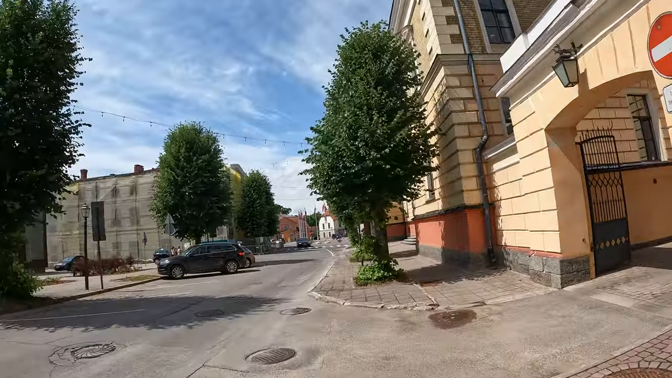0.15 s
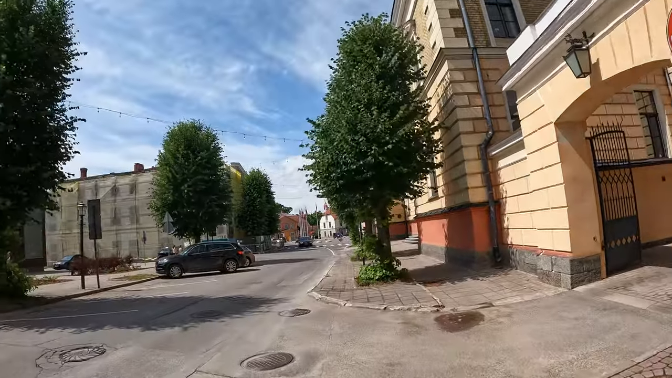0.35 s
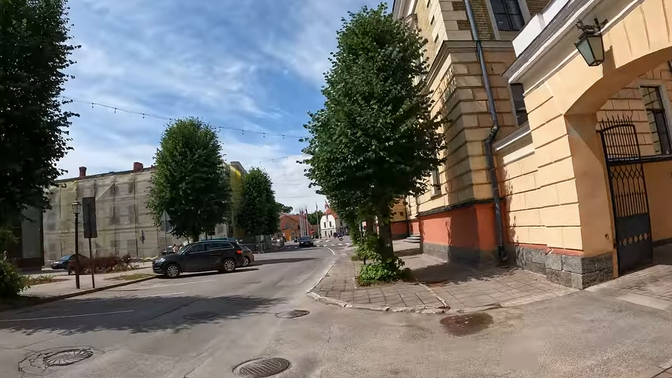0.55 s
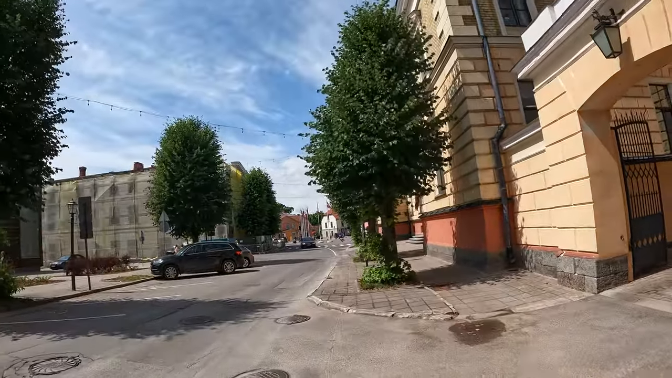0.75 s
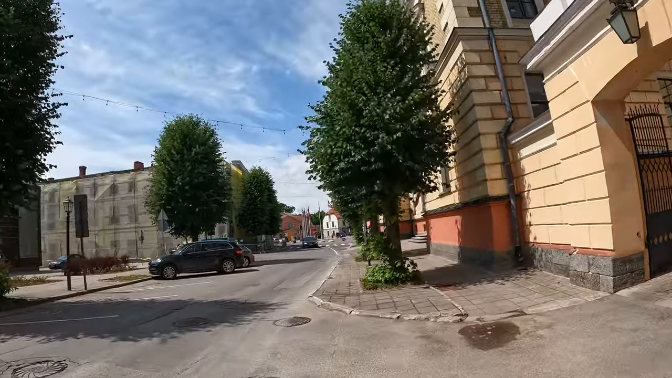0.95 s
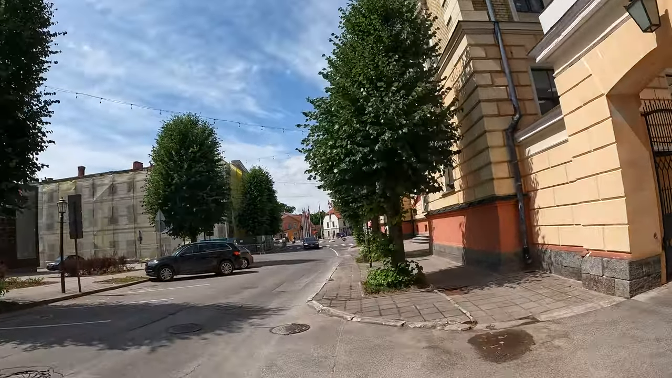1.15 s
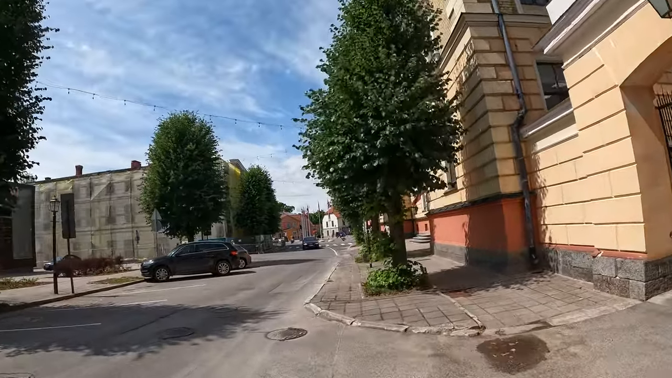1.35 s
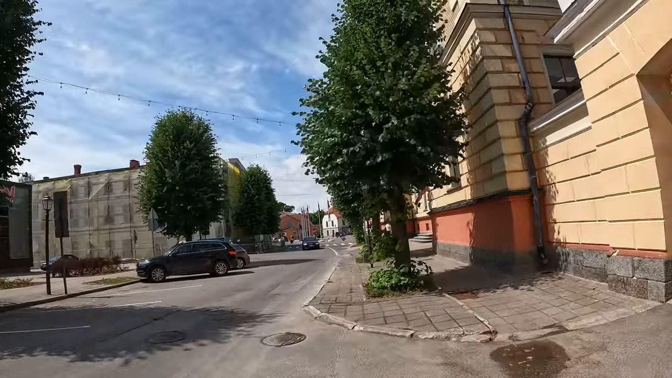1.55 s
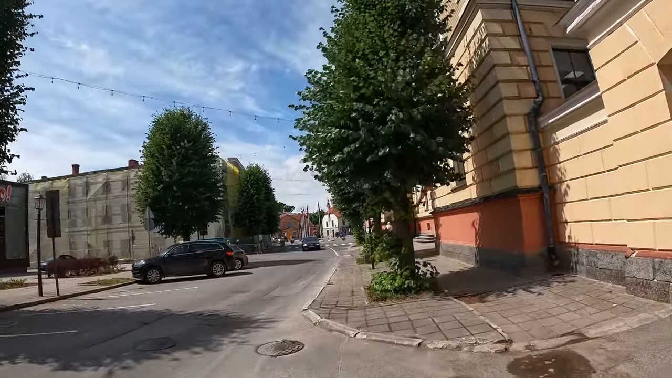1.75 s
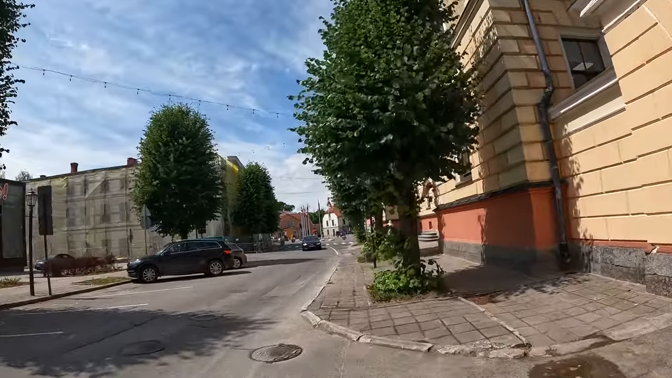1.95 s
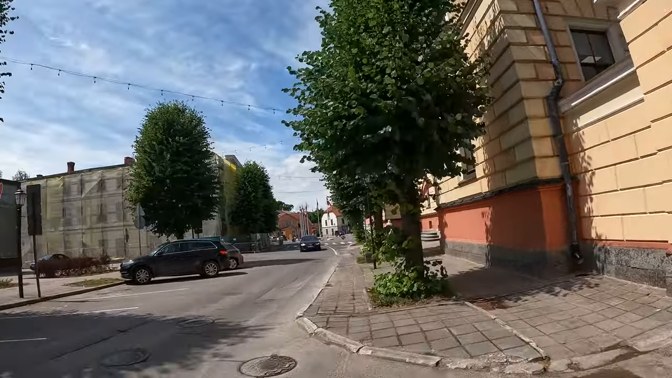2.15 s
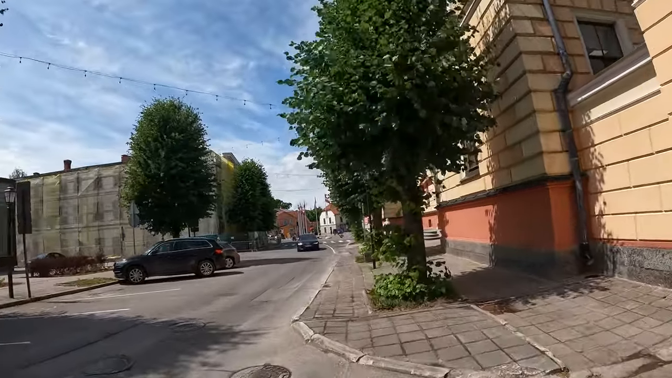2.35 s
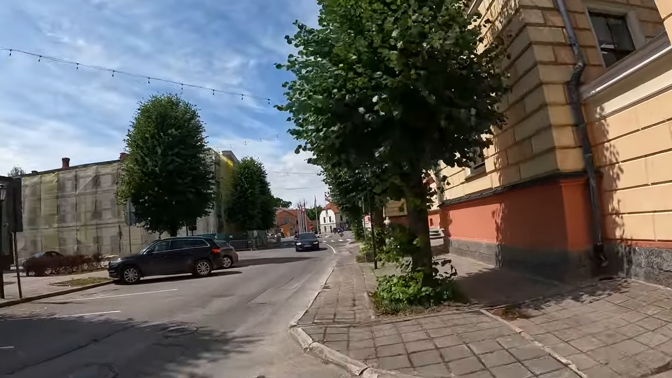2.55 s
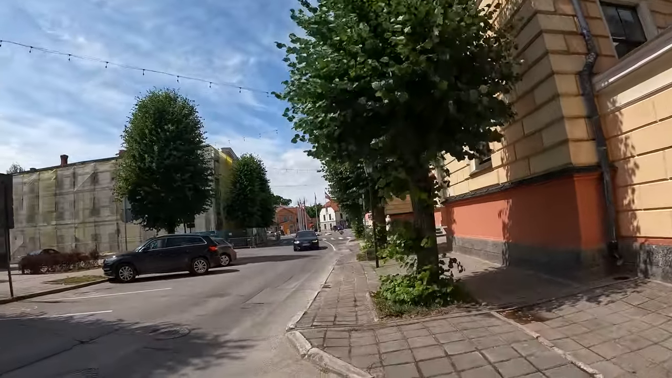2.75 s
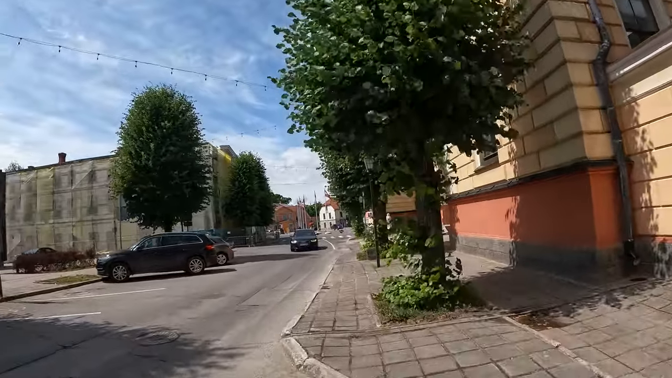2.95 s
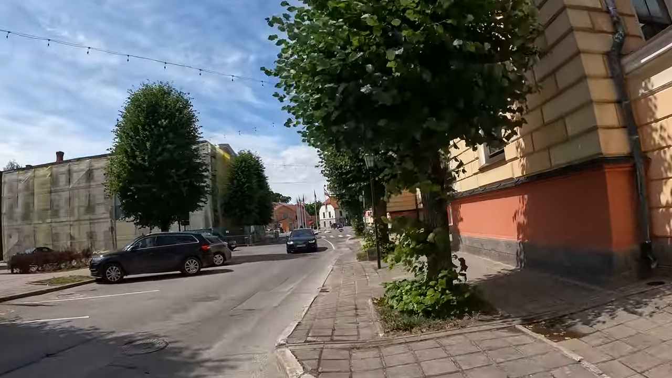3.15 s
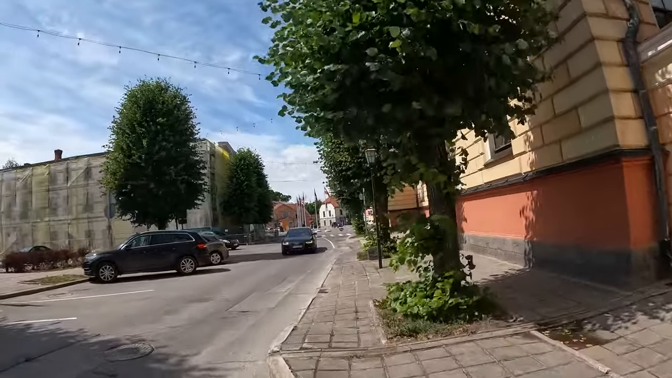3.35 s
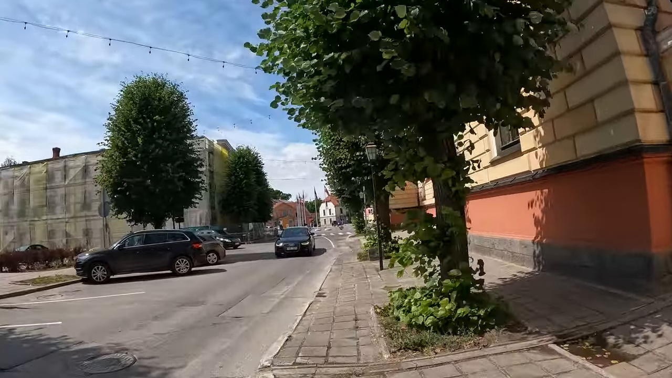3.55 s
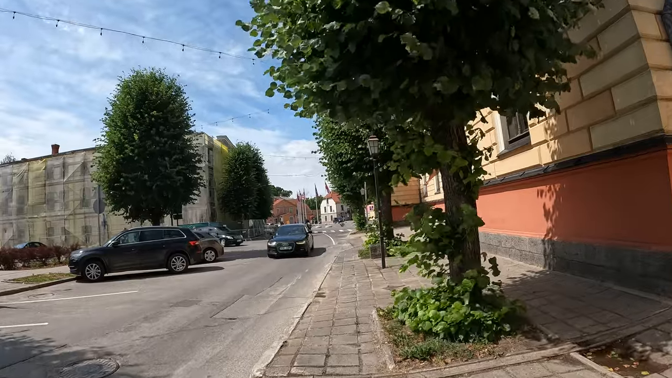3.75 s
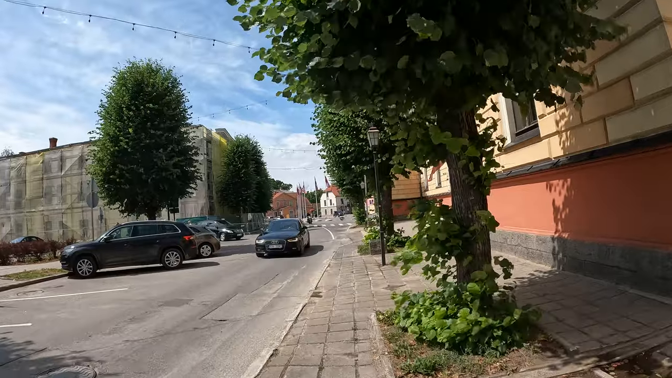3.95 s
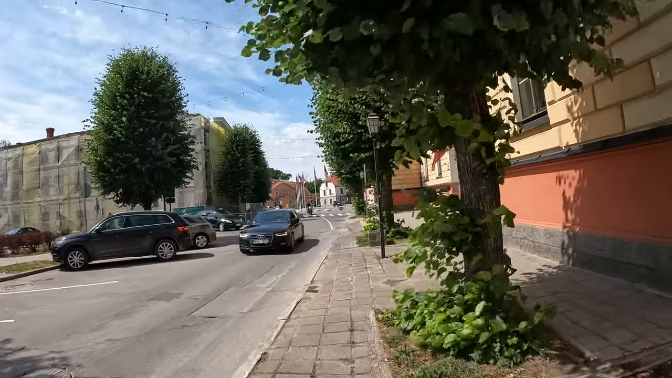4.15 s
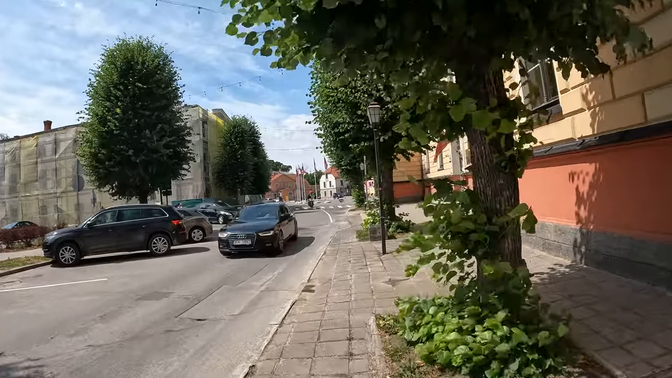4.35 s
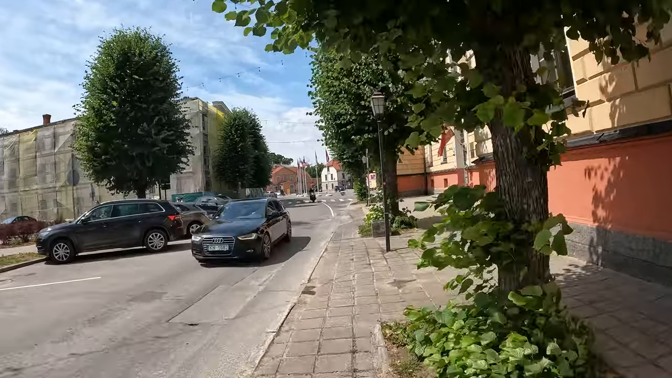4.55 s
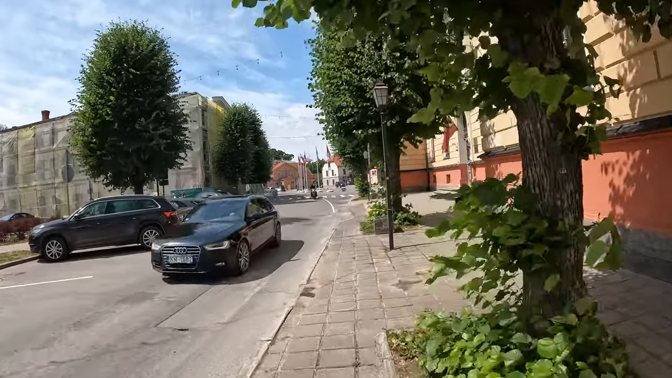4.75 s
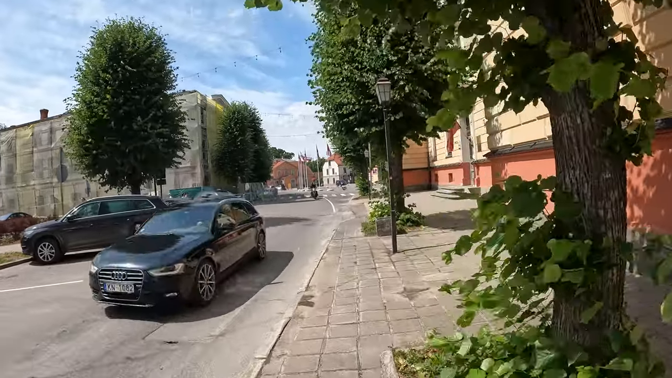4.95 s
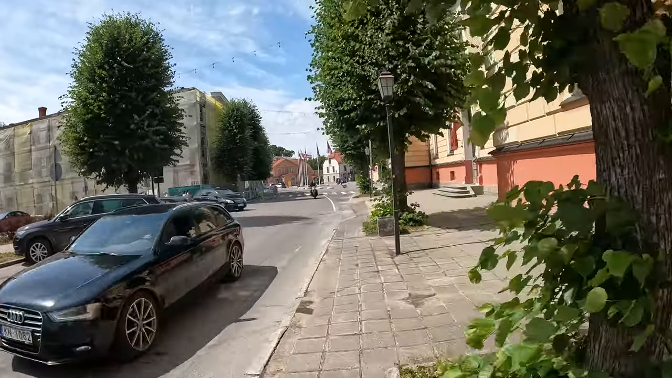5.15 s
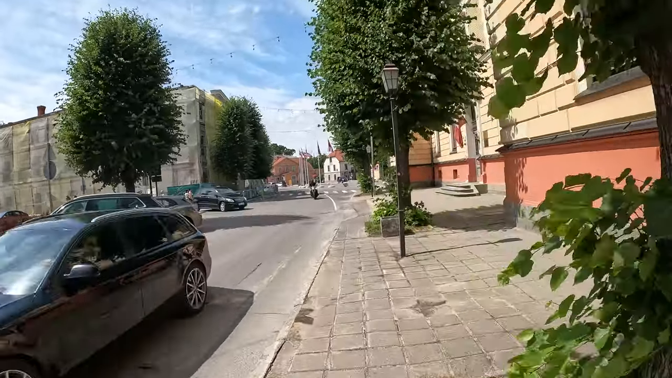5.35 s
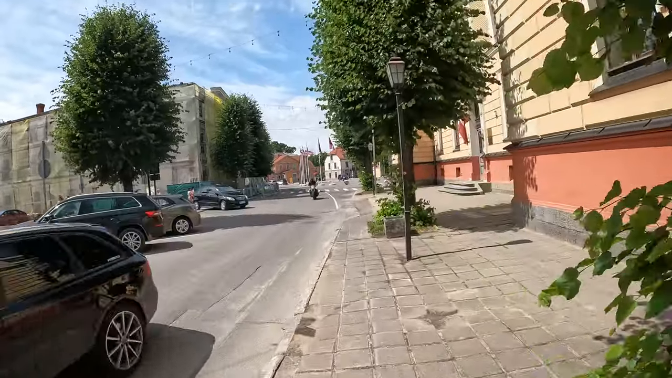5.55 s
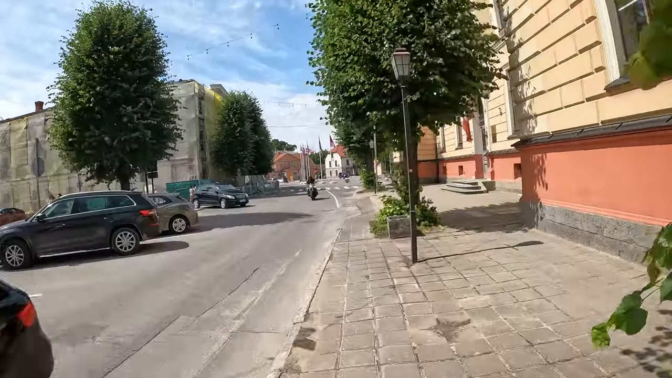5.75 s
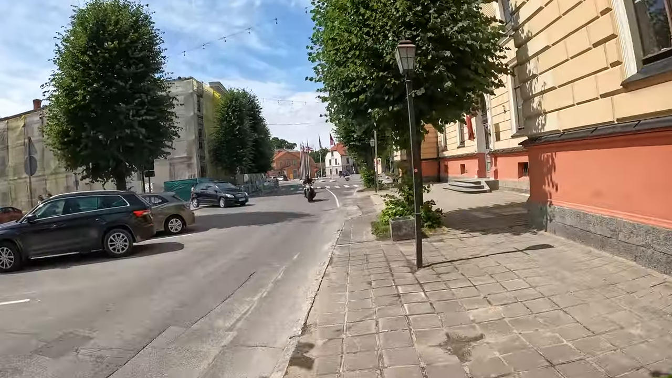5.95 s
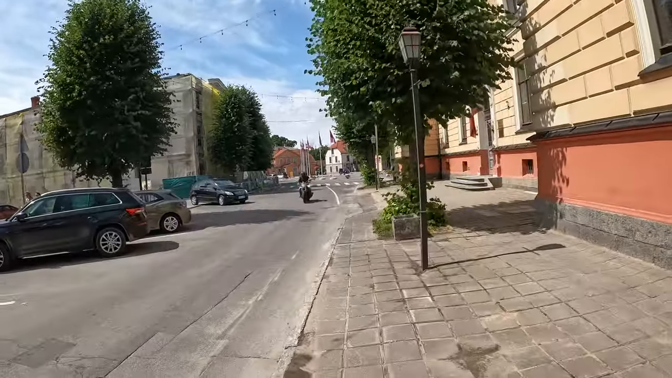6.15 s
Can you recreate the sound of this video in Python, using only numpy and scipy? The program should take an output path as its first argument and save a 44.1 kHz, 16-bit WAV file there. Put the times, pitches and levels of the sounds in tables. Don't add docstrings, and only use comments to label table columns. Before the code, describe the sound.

Tyre noise on asphalt starts faint and grows into a full, hissing rush as a car passes close beside the pavement. Beneath it a motorcycle hums in clear, wavering low tones, climbs in revs, dips at a gear change and continues with a thin whine. Wind lumps buffet the covered single microphone, over low street rumble, with sparse shoe scuffs, gritty ticks and heel knocks.

```python
import sys
import numpy as np
from scipy import signal
from scipy.fft import rfft, irfft, next_fast_len
from scipy.io import wavfile

SR = 44100
rng = np.random.default_rng(int(sys.argv[2]) if len(sys.argv) > 2 else 0)


def rack_gain(trim_db):
    fader = np.asarray(trim_db, float)
    return 10 ** (fader / 20)


def wrap_up_sound(samples):
    columns = np.atleast_2d(samples).T
    tamed = np.clip(columns, -1, 1)
    steps = np.round(tamed * 32767).astype(np.int16)
    wavfile.write(sys.argv[1], SR, steps)


N = 273856

# time in seconds, roar in dB, brightness in dB (open sight line or leaves and cars).
CAR_PASS = [(0, -47.5, 3.2), (.5, -45, -4.5), (1, -45.5, -1.5), (1.5, -37, -2.5), (2.1, -36, -1),
            (2.5, -37.5, -4), (3.2, -37.5, -3), (3.7, -35, 1), (4.1, -32.5, -1), (4.5, -30.5, -2),
            (4.9, -28.5, -0.5), (5.18, -27, 0), (5.28, -24.5, -1.5), (5.4, -30, -1.5), (5.84, -33.5, 0.2),
            (6.21, -39.5, 2)]
# frequency in Hz, level in dB.
ROAR_COLOUR = [(150, 15), (250, 2), (400, -4.5), (600, 0), (800, -3), (1000, 1), (1200, -6.5), (1700, -3.5),
               (2500, -43.5)]
# frequency in Hz, level in dB per Hz.
HISS_COLOUR = [(1000, 5), (1700, -3), (2500, 2), (3600, -5), (4500, -8), (6000, -15), (7500, -21),
               (10000, -25)]
# frequency in Hz, level in dB per Hz.
FIZZ_COLOUR = [(6000, -16), (8000, -2), (11000, -8.5), (16000, -3.5)]
# time in seconds, centre in Hz.
TREAD_NOTE = [(0, 726.4), (2, 829), (4.1, 854), (4.75, 661), (5.28, 538.4), (5.6, 620), (6.21, 531)]
# start in seconds, end in seconds, level in dB.
ABREAST_SWELL = [
    (5.23, 5.3, -24.5),
]

# time in seconds, firing rate in Hz.
FIRING_RATE = [(0.0, 30.62), (0.1, 31.08), (0.55, 29.86), (0.64, 31.77), (1.16, 33.22), (2.18, 30.72),
               (2.56, 29.38), (3.06, 28.6), (3.77, 31.47), (3.98, 31.46), (4.5, 35.17), (4.64, 34.33),
               (5.26, 42.14), (5.31, 41.9), (5.41, 37.2), (5.48, 35.67), (5.67, 38.82), (6.21, 34.64)]
# multiple of the firing rate, level in dB beside the third order.
WITH_THIRD_ORDER = [(2, -15.5)]
# multiple of the firing rate, level in dB beside the first order.
WITH_FIRST_ORDER = [(15, -14), (9, -19)]
# multiple of the firing rate, level in dB beside the growing upper level.
UPPER_ORDERS = [(6, 2), (7, 0), (8, 0.5), (9, -7), (10, -8.5), (11, -21), (12, -9), (14, -11.5), (17, -11),
                (19, -9.5), (21, -15.5), (24, -10.5)]
# start in
# seconds, end in seconds, level in dB.
FIRST_FOCUS = [
    (5.86, 6.3, -31),
]
THIRD_FOCUS = [
    (.05, .5, -59),
    (1.85, 2.08, -32),
    (5.1, 5.2, -22.5),
    (5.3, 6.3, -18),
]
FOURTH_FOCUS = [(.1, .5, -29.5), (1.6, 1.8, -31.5), (2.02, 3.0, -24.5), (3.35, 3.6, -25.5),
                (4.03, 4.55, -29), (4.62, 4.82, -26), (5.36, 5.78, -23.5), (5.94, 6.3, -20)]
FIFTH_FOCUS = [(0, .45, -35), (.62, 1.14, -27), (1.35, 1.6, -32), (1.8, 2.35, -27), (2.42, 3.07, -27),
               (3.32, 3.64, -24), (3.66, 3.8, -29), (3.9, 4.56, -23), (4.62, 4.76, -23),
               (4.83, 5.38, -22.5), (5.43, 5.7, -25), (5.94, 6.1, -23.5)]
EIGHTH_FOCUS = [
    (.12, .55, -39),
    (1.3, 2.1, -40),
    (5.0, 5.35, -37),
]
# start in seconds, end in seconds, lift in dB.
THROTTLE_BITE = [
    (4.3, 4.65, 5),
    (4.8, 5.28, 9),
]
# start in seconds, end in seconds, level in dB.
WHINE_FOCUS = [
    (3.25, 3.55, -50),
    (3.6, 4.7, -48),
    (4.87, 5.35, -47.5),
    (5.47, 6.3, -47),
]
# time in seconds, frequency in Hz, level in dB.
IDLING_LINE = [(0, 113.1, -27.5), (.25, 128, -40), (.5, 118.3, -42), (.9, 120, -34), (1.4, 121.3, -26),
               (1.7, 118, -33.5), (2, 119.3, -54)]

# time in seconds, level in dB, rise in seconds, centre in Hz, spread in octaves.
SHOE_SCUFFS = [(.028, -34, .012, 3300, 1.6), (.03, -39, .015, 15000, .5), (1.662, -36, .018, 2800, 1.3),
               (2.13, -41, .035, 2600, 1.5), (3.95, -43, .022, 3000, 1.4), (1.95, -45, .03, 2800, 1.4),
               (2.93, -49, .02, 3500, 1.3), (3.3, -48, .02, 4200, 1.3), (3.42, -48, .02, 4200, 1.3),
               (4.803, -40, .003, 14000, .6), (5.695, -29, .004, 1400, 1.2), (5.742, -36, .03, 1800, 2.0),
               (5.745, -40, .025, 14000, .6)]
# time in seconds, level in dB, ring in Hz.
GRIT_TICKS = [(.141, -42, 12700), (.985, -35, 12200), (.986, -43, 9743), (4.8, -34, 12400),
              (5.233, -36, 7993)]
# time in seconds, level in dB, pitch in Hz, 60 dB decay in seconds.
HEEL_KNOCKS = [
    (.022, -25, 803, 0.07),
    (.031, -23.5, 710, 0.05),
    (5.789, -13.5, 663, 0.031),
]

# time in seconds, peak in dB, half length in seconds, sharpness of the edge in dB.
WIND_GUSTS = [(.2, -37.5, 0.11, -11), (0.71, -35, 0.051, -20), (1.09, -17.5, 0.062, -16),
              (1.174, -17.5, 0.024, -27), (1.237, -19.5, .03, -6.5), (1.318, -16, 0.067, -13.5),
              (1.462, -28, 0.039, -13.5), (1.608, -19, 0.059, -14.5), (1.82, -23, .1, -25),
              (1.93, -28.5, 0.045, -17), (2.167, -18, 0.053, -24), (2.423, -16.5, 0.11, -27),
              (2.621, -25, 0.084, -22), (2.802, -30, 0.1, -15), (3.072, -17.5, 0.057, -32),
              (3.25, -16, .07, -27), (3.468, -26, 0.095, -19), (3.717, -22.5, 0.15, -23),
              (4.002, -29, .06, -21), (4.426, -23, 0.13, -16), (4.953, -22.5, 0.079, -10),
              (5.107, -24.5, .05, -15), (5.271, -17.5, 0.045, -22), (5.82, -26.5, 0.19, -7),
              (6.111, -26.5, 0.12, -9)]
# frequency in Hz, level in dB.
COVERED_MICROPHONE = [(20, -3), (7000, -1), (7550, -10), (7800, -14.5), (8300, -19.5), (9000, -16),
                      (10000, -12), (11300, -16.5), (12500, -16), (14000, -26.5), (16000, -31)]
# start in seconds, end in seconds, share removed in dB.
DULL_TOP = [
    (1.35, 2.88, 0),
    (3.35, 4.72, 0),
]

FAR_DB = -38


def tyres():
    roar_db, bright_db = in_time(CAR_PASS)
    near_db = roar_db - FAR_DB
    roar_tilt_db = 2.5 - 0.27 * near_db + 0.83 * bright_db
    roar = rack_gain(roar_db + 2.5) * banded_noise(ROAR_COLOUR, patchy_db=0.78, tilt_db=roar_tilt_db)

    hiss_db = -47 + 0.67 * near_db + bright_db
    hiss = rack_gain(hiss_db + 3.5) * banded_noise(HISS_COLOUR, patchy_db=0.92)
    fizz_db = -79 + 0.88 * near_db + 0.55 * bright_db
    air_tilt_db = 1.5 * (fizz_db + 71)
    fizz = rack_gain(fizz_db + 20) * banded_noise(FIZZ_COLOUR, patchy_db=-1.5, tilt_db=air_tilt_db)

    tread_hz, = in_time(TREAD_NOTE)
    tread_db = -40 + 0.57 * near_db + 1.5 * drift(2.5)
    tread = gliding_band(tread_hz, tread_db, width_hz=160)
    swell = gliding_band(tread_hz, spells(ABREAST_SWELL, -68), width_hz=90)
    return roar + tread + swell + hiss + fizz


def motorcycle():
    waver_db, jitter_rad = 0.8, 0.15
    firing_hz, = in_time(FIRING_RATE)
    turn = 2 * np.pi * np.cumsum(firing_hz) / SR
    first_db = spells(FIRST_FOCUS, -43)
    third_db = spells(THIRD_FOCUS, -33.5)
    orders = [(1, first_db), (3, third_db)]
    orders += [(4, spells(FOURTH_FOCUS, -39.5)), (5, spells(FIFTH_FOCUS, -42.5))]
    orders += [(8, spells(EIGHTH_FOCUS, -70))]
    orders += [(k, third_db + db) for k, db in WITH_THIRD_ORDER]
    orders += [(k, first_db + db) for k, db in WITH_FIRST_ORDER]

    upper_db = -46 + 0.74 * np.arange(N) / SR
    bite_db = spells(THROTTLE_BITE, 0)
    for k, db in UPPER_ORDERS:
        echo_db = 2.13 * drift(5.3)
        orders.append((k, upper_db + db + bite_db * (k >= 12) + echo_db))

    exhaust = np.zeros(N)
    for k, db in orders:
        level = rack_gain(db + waver_db * drift(22))
        wander = jitter_rad * np.sqrt(k / 3) * drift(4.5)
        exhaust += level * np.sin(k * turn + wander + rng.uniform(0, 2 * np.pi))
    return np.sqrt(2) * exhaust


def gears():
    teeth_per_firing = 98
    hz = teeth_per_firing * in_time(FIRING_RATE)[0]
    db = spells(WHINE_FOCUS, -67)
    shaky = np.sin(2 * np.pi * np.cumsum(hz) / SR + 1.8 * drift(70))
    return rack_gain(db - 5) * shaky + gliding_band(hz, db - 3, width_hz=120)


def footsteps():
    fall_s = 0.027
    t, out = np.arange(N) / SR, np.zeros(N)
    grains = rng.standard_normal(N) * rack_gain(2 * drift(300))
    bands = []
    for hz in 600 * 2 ** np.arange(0, 5, .5):
        bands.append((hz, rms_one(band(grains, hz / 2 ** .25, hz * 2 ** .25))))

    for s, db, rise_s, centre_hz, spread in SHOE_SCUFFS:
        shape = np.exp(-np.where(t < s, ((s - t) / rise_s) ** 2, (t - s) / fall_s))
        for hz, noise in bands:
            octaves_off = np.log2(hz / centre_hz)
            out += shape * rack_gain(db - 3 - 6 * (octaves_off / spread) ** 2) * noise

    for s, db, hz in GRIT_TICKS:
        out += ring(s, db, hz, t60=.006)
    for s, db, hz, t60 in HEEL_KNOCKS:
        out += ring(s, db, hz, t60)
        out += ring(s + .003, db - 7, hz * 1.25, t60 / 2)
    return out


def idling():
    hz, db = in_time(IDLING_LINE)
    return np.sqrt(2) * rack_gain(db) * np.sin(2 * np.pi * np.cumsum(hz) / SR)


def wind():
    breeze_db, breeze_edge_db = -31.5, -52.5
    t = np.arange(N) / SR
    push, sharp = rack_gain(breeze_db), rack_gain(breeze_edge_db)
    for s, db, half_s, sharp_db in WIND_GUSTS:
        gust = rack_gain(db) * np.exp(-((t - s) / half_s) ** 2)
        push = push + gust
        sharp = sharp + gust * rack_gain(sharp_db)

    wind_swing_db = 20 * np.log10(push) - breeze_db
    car_swing_db = in_time(CAR_PASS)[0] - FAR_DB
    rumble_db = -37 + 0.44 * wind_swing_db + 0.35 * car_swing_db + 4 * drift(6.6)

    white = rng.standard_normal((3, N))
    buffet = rms_one(band(white[0], 9.1, 65))
    edge = rms_one(band(white[1], 150, 354) * rack_gain(1.1 * drift(21)))
    rumble = rms_one(band(white[2], 65, 210))
    return push * buffet + sharp * edge + rack_gain(rumble_db) * rumble


def rms_one(x):
    return x / np.sqrt(np.mean(x ** 2) + 1e-20)


def in_time(rows):
    s, *columns = np.transpose(rows)
    return [np.interp(np.arange(N) / SR, s, c) for c in columns]


def at_hz(points, hz):
    point_hz, point_db = np.transpose(points)
    return np.interp(np.log(hz), np.log(point_hz), point_db)


def spells(rows, between_db):
    edge_s = 0.047
    t = np.arange(0, N + 64, 64) / SR
    lift = 0
    for start, end, db in rows:
        plateau = (np.tanh((t - start) / edge_s) - np.tanh((t - end) / edge_s)) / 2
        lift = lift + rack_gain(db) * plateau
    level_db = 20 * np.log10(rack_gain(between_db) + np.abs(lift))
    return np.interp(np.arange(N) / SR, t, level_db)


def drift(rate):
    r = np.exp(-16 * np.pi * rate / SR)
    slow = signal.lfilter([1], [1, -2 * r, r * r], rng.standard_normal(N // 8 + 8002))
    slow = slow[8000:]
    return np.interp(np.arange(N) / 8, np.arange(len(slow)), rms_one(slow - slow.mean()))


def band(x, low_hz, high_hz):
    edges_hz = [low_hz, min(high_hz, SR * .45)]
    return signal.sosfilt(signal.butter(2, edges_hz, "band", fs=SR, output="sos"), x)


def banded_noise(spectrum, patchy_db, tilt_db=0):
    low, high = spectrum[0][0], spectrum[-1][0]
    edges = np.geomspace(low, high, int(3 * np.log2(high / low)) + 2)
    white = rng.standard_normal((2, N))
    together, out = drift(7.6), 0
    for k, (a, b) in enumerate(zip(edges, edges[1:])):
        hz = np.sqrt(a * b)
        octaves = np.clip(np.log2(hz / np.sqrt(low * high)), -1, 1)
        flicker_db = patchy_db * (0.96 * together + drift(4.3))
        level_db = at_hz(spectrum, hz) + tilt_db * octaves + flicker_db
        out = out + rack_gain(level_db) * band(white[k % 2], a, b)
    return rms_one(out)


def gliding_band(hz, db, width_hz):
    turn = 2 * np.pi * np.cumsum(hz) / SR
    return rack_gain(db) * (drift(width_hz) * np.cos(turn) + drift(width_hz) * np.sin(turn))


def ring(s, db, hz, t60):
    t = np.maximum(np.arange(N) / SR - s, 0)
    return rack_gain(db - 60 * t / t60) * np.sin(2 * np.pi * hz * t)


def scene():
    mix = tyres() + motorcycle() + gears() + footsteps() + idling() + wind()
    return mix[None]


def roll_off(x):
    return signal.sosfilt(signal.butter(12, 15720, fs=SR, output="sos"), x)


def record(dry):
    size = next_fast_len(N + 4096)
    colour = rack_gain(at_hz(COVERED_MICROPHONE, np.fft.rfftfreq(size, 1 / SR) + 1))
    self_noise = rack_gain(-59.5) * band(rng.standard_normal(N), 9000, 16000)
    full = irfft(rfft(dry + self_noise, size) * colour, size)[:, :N]

    low_pass = signal.cheby2(8, 30, 13300, fs=SR, output="sos")
    top = full - signal.sosfiltfilt(low_pass, full)
    return roll_off(full - top * rack_gain(spells(DULL_TOP, -80)))


dry = scene()
out = record(dry)
wrap_up_sound(out)
```